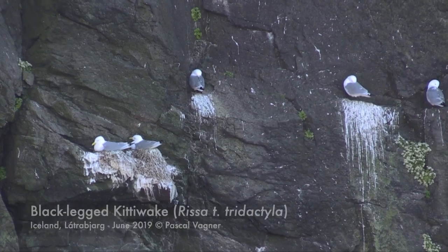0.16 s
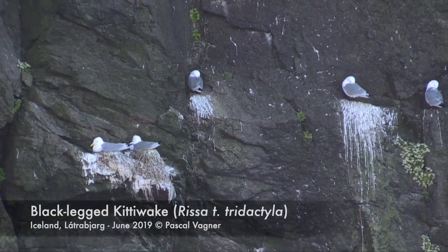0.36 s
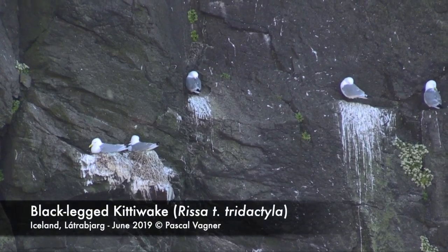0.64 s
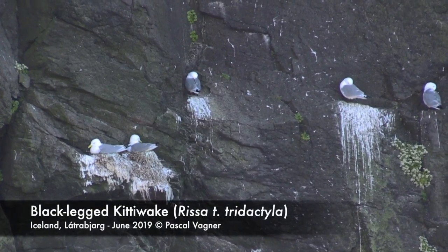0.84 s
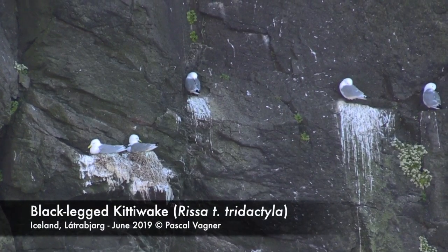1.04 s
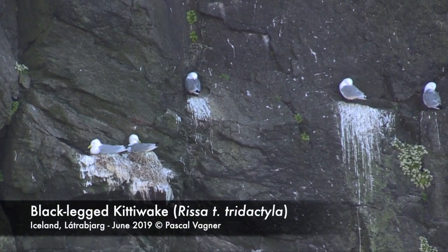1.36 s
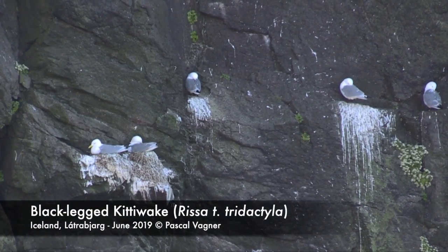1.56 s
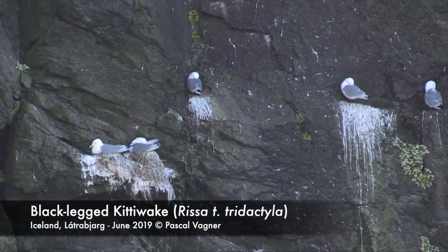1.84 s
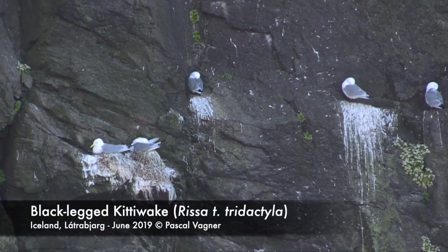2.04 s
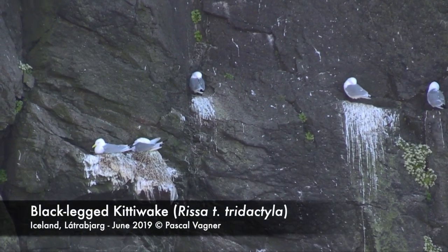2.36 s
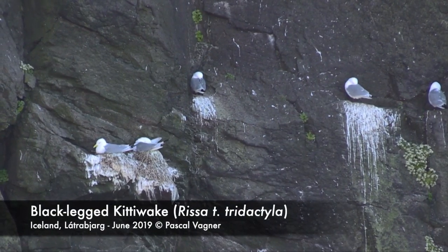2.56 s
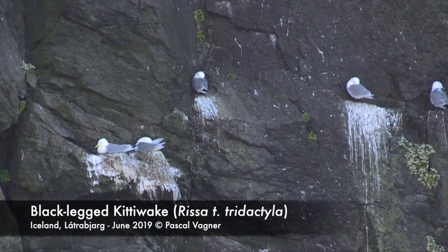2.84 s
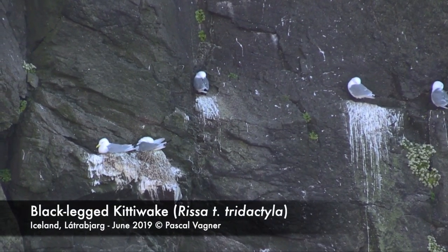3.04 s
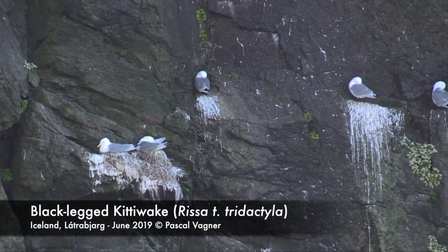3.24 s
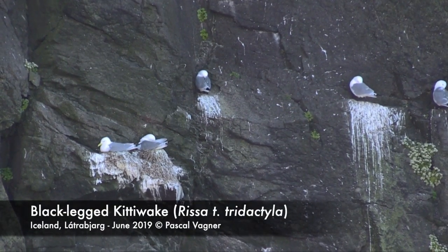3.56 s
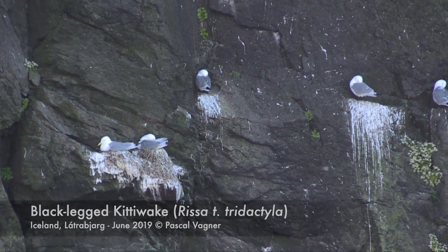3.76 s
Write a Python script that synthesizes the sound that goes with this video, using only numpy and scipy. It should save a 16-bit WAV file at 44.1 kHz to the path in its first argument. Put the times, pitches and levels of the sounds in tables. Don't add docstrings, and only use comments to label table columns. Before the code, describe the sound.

Gulls call on a sea cliff: hoarse cackling is densest from 0.1 to 1.1 seconds, with the loudest squeals near 0.4. A hard raspy break and falling squeal come at 1.2, then spaced cackles and clucks, with squeals around 2.1, 3.0 and 3.8. A far colony clamours continuously over faint surf, with short rock echoes. Soft wind puffs touch the microphone between 0.4 and 2.7.

```python
import sys
import numpy as np
from scipy import signal
from scipy.fft import rfft, irfft
from scipy.io import wavfile

SR = 44100
rng = np.random.default_rng(int(sys.argv[2]) if len(sys.argv) > 2 else 0)


def materialize(psi):
    bounded = np.clip(np.atleast_2d(psi).T, -1, 1)
    quanta = np.round(bounded * 32767).astype(np.int16)
    wavfile.write(sys.argv[1], SR, quanta)


def gain_from_db(level_db):
    decades = np.asarray(level_db, float) / 20
    return 10 ** decades


N = 172431

# time in seconds, level in dB.
CLAMOUR_LEVEL = [(.05, -35), (.5, -35.5), (.7, -37.5), (1.25, -35), (1.4, -38.5), (1.75, -39), (2.1, -38),
                 (2.45, -40), (2.78, -40), (3.05, -40), (3.25, -40), (3.55, -38.5), (3.9, -38)]
# frequency in Hz, density in dB per Hz.
CLAMOUR_COLOUR = [(300, -33), (450, -24), (700, -5.5), (1300, 3.5), (1900, -3), (4000, -12.5),
                  (10500, -37.5), (15000, -56)]
# frequency in Hz, density in dB per Hz.
SURF_COLOUR = [(15, -48), (25, -5), (97, -10), (128, -7.5), (243, -14.5), (600, -2), (780, -26),
               (1320, -120)]
# start in seconds, length in seconds, start pitch in Hz, end pitch in Hz,
# level in dB, beak resonance in Hz.
SQUEALS = [
    (0.03, 0.098, 962, 924, -43, 5240),
    (1.214, 0.11, 935, 892, -34.5, 5190),
    (2.102, 0.098, 930, 865, -36.5, 4240),
    (2.165, 0.059, 845, 840, -55, 2600),
    (3.008, 0.078, 900, 888, -42, 3580),
    (3.049, 0.057, 861, 856, -42.5, 3430),
    (3.11, 0.023, 857, 840, -40.5, 3350),
    (3.771, 0.048, 950, 947, -50.5, 3800),
    (3.854, 0.053, 946, 922, -45.5, 3780),
    (3.888, .04, 889, 904, -38, 2630),
]
# start in seconds, length in seconds, start pitch in Hz, end pitch in Hz,
# level in dB.
SCREAMS = [
    (.357, 0.069, 941.6, 918.6, -28),
    (.432, 0.0473, 921, 877, -34),
]
# start in seconds, length in seconds, start pitch in Hz, beak resonance in Hz,
# level in dB.
RISES = [(0.036, 0.22, 628.4, 2140, -45), (.045, .1, 718, 2870, -51), (.282, 0.075, 661, 4650, -41),
         (.335, 0.057, 686, 4870, -43), (0.712, 0.058, 598, 2900, -48.5), (0.756, 0.039, 698, 2150, -44.5),
         (0.766, .07, 620, 4800, -44), (0.842, 0.075, 636, 3200, -49.5), (0.898, 0.124, 648.4, 4760, -41),
         (1.032, 0.1, 604, 2400, -53.5), (1.116, 0.12, 655, 4600, -46), (1.584, 0.032, 648, 2740, -45),
         (1.621, 0.057, 698, 2630, -46.5), (1.824, .09, 703, 3270, -51.5), (1.93, 0.24, 616.5, 2540, -53.5),
         (2.053, 0.15, 660, 2250, -47.5), (2.474, 0.077, 599.5, 4850, -45.5), (2.808, 0.05, 650, 2620, -53),
         (2.935, 0.024, 602, 4150, -43), (2.962, 0.056, 624, 3140, -49.5), (3.361, 0.058, 619.5, 4400, -47),
         (3.74, 0.15, 634, 3200, -57), (3.852, 0.09, 631, 3160, -50)]
# multiple of the pitch, level in dB.
RISE_PARTIALS = [(1, -9.5), (2, -4), (3, -1.5), (5, -4), (7, -12.5), (11, -25.5)]
# multiple of the pitch, level in dB.
SQUEAL_PARTIALS = [(1, -27), (2, -1), (3, -8.5), (4, -10.5), (5, -11.5), (6, -14), (7, -20.5), (8, -26)]
# multiple of the pitch, level in dB.
SCREAM_PARTIALS = [(1, -42), (2, -0.5), (3, -20), (4, -7), (5, -22), (6, -18.5), (7, -37), (8, -19.5)]
# start in seconds, peak level in dB, length in seconds, throat resonance in Hz.
CACKLES = [(0.14, -28.5, 0.015, 1345), (0.401, -24, 0.024, 1313), (0.475, -24.5, 0.025, 1300),
           (0.539, -25.5, 0.034, 1340), (0.63, -24.5, 0.03, 1270), (.705, -23.5, .035, 1333),
           (0.801, -21.5, 0.024, 1287), (0.871, -23.5, 0.028, 1250), (0.901, -23, 0.024, 1250),
           (0.918, -31.5, 0.041, 1270), (0.984, -27, 0.045, 1246), (1.03, -30.5, 0.06, 1315),
           (1.119, -34, 0.016, 1260), (1.413, -27, 0.012, 1290), (1.6102, -23.5, .024, 1274),
           (1.781, -23, 0.033, 1250), (1.914, -22, 0.021, 1320), (2.031, -25, .025, 1330),
           (2.145, -27, 0.022, 1410), (2.2645, -27, 0.013, 1294), (2.385, -29.5, .03, 1300),
           (2.504, -25.5, 0.011, 1330), (2.6474, -27.5, 0.031, 1320), (2.8095, -23, 0.012, 1310),
           (2.923, -28, 0.022, 1240), (3.054, -28, .008, 1360), (3.159, -27, 0.014, 1330),
           (3.309, -29, 0.023, 1270)]
# multiple of the main one, width in Hz, level in dB.
THROAT = [(1, 120, 0), (1.45, 350, -9), (2.3, 700, -15), (3.3, 900, -18), (4.6, 1500, -22)]
# start in seconds, length in seconds, level in dB, centre frequency in Hz.
PUFFS = [(0.402, 0.066, -52, 260), (0.477, 0.014, -42, 248), (0.516, 0.068, -60.5, 247),
         (0.647, 0.15, -48.5, 298), (0.895, 0.073, -45, 390), (1.042, 0.036, -53.5, 330),
         (1.127, 0.023, -39, 523), (1.157, 0.061, -47, 367), (0.836, 0.026, -51, 378),
         (1.241, 0.041, -48, 418), (1.294, 0.054, -52.5, 427), (1.488, 0.039, -74, 460),
         (1.4, 0.19, -53.5, 467), (1.607, 0.11, -49.5, 470), (1.764, 0.18, -47, 500),
         (1.958, 0.012, -41, 505), (1.996, 0.065, -51.5, 476), (2.134, 0.051, -54.5, 403),
         (2.193, 0.037, -45, 454), (2.277, 0.061, -50, 452), (2.357, 0.037, -59, 456),
         (2.423, 0.0089, -57, 402), (2.458, 0.02, -58.5, 400), (2.496, 0.034, -55.5, 486),
         (2.547, 0.022, -47.5, 513), (2.619, 0.015, -59, 405), (2.67, 0.013, -51, 460)]
# start in seconds, peak level in dB.
RASPS = [
    (0.4794, -43),
    (0.547, -23),
    (0.633, -26.5),
    (1.2079, -14),
    (1.7818, -48),
    (2.653, -23),
    (2.81, -30.5),
]
# start in seconds, peak level in dB, throat resonance in Hz.
CLUCKS = [(1.1464, -46, 1070), (1.714, -28, 1030), (1.9923, -36, 1250), (2.2137, -21.5, 1460),
          (2.2214, -21, 1550), (2.3214, -23, 1500), (2.4273, -29, 1350), (2.5494, -24, 1260),
          (2.573, -25, 1420), (2.6264, -31, 1210), (3.559, -24.5, 1380), (3.7823, -24, 1260)]
# frequency in Hz, lead of the left port in radians.
PORT_PHASE = [(1, 0.23), (340, -1.2), (1290, -0.82), (2330, -1.19), (5340, -2.03), (15300, -0.92)]
# frequency in Hz, share of the sound common to both.
PORT_SHARE = [(60, 0.099), (250, 0.29), (430, 1), (750, 0.65), (1300, 0.25), (4000, 0.77), (12000, 0.045)]
# time in seconds, lead of the left port in radians.
PORT_TURN = [(0, 3.25), (.75, 2.84), (1.1, 2.79), (2.4, 1.3), (2.8, 0.27), (3.9, 0.14)]


def in_time(rows):
    s, value = np.transpose(rows)
    return np.interp(np.arange(N) / SR, s, value)


def at_hz(points, hz):
    f, value = np.transpose(points)
    return np.interp(np.log(hz + 1), np.log(f + 1), value)


def rms_one(x):
    return x / np.sqrt(np.mean(x ** 2) + 1e-20)


def drift(rate_hz):
    r = np.exp(-80 * np.pi * rate_hz / SR)
    slow = signal.lfilter([1], [1, -2 * r, r * r], rng.standard_normal(N // 40 + 2002))[2000:]
    return np.interp(np.arange(N) / 40, np.arange(len(slow)), rms_one(slow))


def band(x, low_hz, high_hz):
    return signal.sosfilt(signal.butter(2, [low_hz, high_hz], "band", fs=SR, output="sos"), x)


def resonance(x, hz, width_hz):
    r = np.exp(-np.pi * width_hz / SR)
    poles = [1, -2 * r * np.cos(2 * np.pi * hz / SR), r * r]
    return signal.lfilter([(1 - r * r) / 2, 0, (r * r - 1) / 2], poles, x)


def add(out, s, sound):
    i = int(s * SR)
    out[..., i:i + sound.shape[-1]] += sound[..., :out.shape[-1] - i]


def envelope(length_s, rise_s, fall_s):
    t = np.arange(int((length_s + 4 * fall_s) * SR)) / SR
    return t, np.minimum(t / rise_s, 1) * np.exp(-np.maximum(t - length_s, 0) / fall_s)


def cliff_echo(x):
    t60_s = 0.22
    t = np.arange(int(0.6 * SR)) / SR
    tail = band(rng.standard_normal((2, len(t))), 450, 4830) * gain_from_db(-60 * t / t60_s) * (t > 0.008)
    tail = tail / np.sqrt(np.sum(tail ** 2, 1, keepdims=True))
    return signal.fftconvolve(x, tail, axes=1)[:, :N]


def bed(colour, patchy_db):
    together, edges_hz = drift(3.3), 22 * 2 ** np.arange(0, 9.6, 0.5)
    white = rng.standard_normal((2, 2, N))
    spec, f = rfft(white), np.fft.rfftfreq(N, 1 / SR)
    share = np.clip(at_hz(PORT_SHARE, f), 0, 1)
    common = share * spec[:, 0] * np.exp(-1j * at_hz(PORT_PHASE, f))
    spec[:, 1] = common + np.sqrt(1 - share ** 2) * spec[:, 1]
    white = irfft(spec, N)
    out = 0
    for k, (low, high) in enumerate(zip(edges_hz, edges_hz[1:])):
        flicker = 0.3 * together + drift(13.3)
        depth_db = patchy_db * min(1, 3500 / high) ** 2
        level_db = at_hz(colour, np.sqrt(low * high)) + depth_db * flicker
        out = out + gain_from_db(level_db) * band(white[k % 2], low, high)
    return rms_one(out)


def gliding_notes(rows, partials, hoarse=1.0, beaks=None):
    attack_s, half_release_s, wobble_depth, flutter_db = 0.012, 0.008, 0.005, 7.0
    beak_db, beak_width_hz = 9, 500
    fade_db = 5
    out = np.zeros((2, N))
    wobble = hoarse * (drift(30.3) + drift(117))
    flutter = np.array([drift(18) + 0.6 * drift(90) for _ in range(6)]) - 1
    multiple, partial_db = np.transpose(partials)
    orders = np.arange(1, int(round(multiple[-1])) + 1)
    for j, (s, length, hz0, hz1, level_db) in enumerate(rows):
        t, env = envelope(length - half_release_s, attack_s, half_release_s)
        at = np.minimum(int(s * SR) + np.arange(len(t)), N - 1)
        pitch = (hz0 + (hz1 - hz0) * t / length) * (1 + wobble_depth * wobble[at])
        phase = 2 * np.pi * np.cumsum(pitch) / SR
        draw = rng.random((4, 16))
        for n in orders:
            lead = at_hz(PORT_PHASE, n * hz0) + draw[1, n] - 0.5
            own = flutter[[n % 6, (n + 3) % 6]][:, at]
            own = own - own.mean(1, keepdims=True)
            lift_db = beak_db * np.exp(-((n * hz0 - beaks[j]) / beak_width_hz) ** 2) if beaks else 0
            db = level_db + 6.5 + np.interp(n, multiple, partial_db) + lift_db
            gain = gain_from_db(db + flutter_db * 0.5 * own - fade_db * t / length)
            start = 2 * np.pi * draw[0, n] + np.array([[lead], [0]])
            add(out, s, env * gain * np.sin(n * phase + start))
    return out


def far_birds():
    rows = []
    for when, length, pitch, fall, level in rng.random((100, 5)):
        hz = 580 + 400 * pitch
        rows.append((3.85 * when, 0.0395 + 0.0966 * length, hz, hz * (0.95 + 0.099 * fall), -7 * level))
    return rms_one(gliding_notes(rows, RISE_PARTIALS, hoarse=2.56))


def far_clamour():
    calls_db, wash_db = -10.5, -1
    far = far_birds()
    calls = 0.6 * far + 0.8 * cliff_echo(far)
    wash = bed([(150, -46)] + CLAMOUR_COLOUR, patchy_db=1.0)
    return gain_from_db(in_time(CLAMOUR_LEVEL)) * (gain_from_db(calls_db) * calls + gain_from_db(wash_db) * wash)


def surf():
    surf_db, spray_db = -57.5, -57.5
    rumble = bed(SURF_COLOUR + [(1500, -15.5)], patchy_db=1.5)
    spray = rms_one(band(rng.standard_normal((2, N)), 4450, 9200))
    return gain_from_db(surf_db) * rumble + gain_from_db(spray_db + np.array([[2.5], [-2.5]])) * spray


def near_birds():
    rise_hz_per_s = 130
    glides = [(s, length, hz, hz + rise_hz_per_s * length, db) for s, length, hz, _, db in RISES]
    rises = gliding_notes(glides, RISE_PARTIALS, hoarse=1.61, beaks=[row[3] for row in RISES])
    falls = [row[:5] for row in SQUEALS]
    squeals = gliding_notes(falls, SQUEAL_PARTIALS, beaks=[row[5] for row in SQUEALS])
    return rises + squeals + gliding_notes(SCREAMS, SCREAM_PARTIALS)


def cackles():
    rise_s, fall_s = 0.002, 0.008
    pulse_hz, pulse_jitter, breathy = 330, 0.3, 0.45
    swing_db = 4.5
    out = np.zeros((2, N))
    cycle = np.cumsum(pulse_hz * (1 + pulse_jitter * np.tanh(drift(60)))) / SR
    pulses = (np.diff(np.floor(cycle), prepend=0) > 0) * gain_from_db(3.0 * np.tanh(drift(120))) * 11
    source = pulses + breathy * rng.standard_normal((2, N)) * (1.3 - cycle % 1)
    for s, db, length, throat_hz in CACKLES:
        pan_db = swing_db * np.exp(-((s - 2.1) / 0.3) ** 2)
        t, env = envelope(length, rise_s, fall_s)
        part = source[:, int(s * SR):int(s * SR) + len(t)]
        voice = 0
        for j, (multiple, width_hz, gain_db) in enumerate(THROAT):
            voice = voice + (-1) ** j * gain_from_db(gain_db) * resonance(part, throat_hz * multiple, width_hz)
        voice = rms_one(resonance(voice, throat_hz, 1700)) * env[:part.shape[1]]
        add(out, s - 0.003, voice * gain_from_db(db - 8.5 + pan_db * np.array([[0.5], [-0.5]])))
    return out


def wind():
    lump_db, port_cut_hz, thump_db, veer_db_per_s = 5, 183, -10.5, 14.5
    out = np.zeros((2, N))
    noise = rng.standard_normal(N) * gain_from_db(lump_db * np.tanh(drift(93)))
    high_pass = signal.butter(4, port_cut_hz, "high", fs=SR, output="sos")
    for s, length, db, hz in PUFFS:
        left_db = min(veer_db_per_s * max(s - 0.7, 0), 4.5)
        t, env = envelope(length, 0.0044, 0.018)
        part = noise[int(s * SR):int(s * SR) + len(t)]
        gust = gain_from_db(db) * env * rms_one(band(part, hz * 0.75, hz * 2.58))
        gust = gain_from_db(5.5) * signal.sosfilt(high_pass, gust)
        low = rms_one(band(band(part, 103, 240), 103, 240))
        thump = gain_from_db(thump_db + db) * env * low * (300 / hz) ** 2
        add(out, s, gust * [[gain_from_db(left_db / 2)], [gain_from_db(-left_db / 2)]] + thump)
    return out


def rasps():
    out = np.zeros((2, N))
    for s, db in RASPS:
        t, env = envelope(0.01, 0.0012, 0.007)
        breath = band(rng.standard_normal((2, len(t))), 3250, 9900)
        add(out, s - 0.003, gain_from_db(db - 19.0) * env * rms_one(resonance(breath, 4800, 1850)))
    return out


def clucks():
    width_hz, cluck_db = 190, -3
    out, t = np.zeros((2, N)), np.arange(int(0.02 * SR)) / SR
    env = (1 - np.exp(-t / 0.0012)) * np.exp(-np.pi * width_hz * t)
    for s, db, hz in CLUCKS:
        ring = env * (np.sin(2 * np.pi * hz * t) + 0.59 * np.sin(2.9 * np.pi * hz * t))
        add(out, s - 0.002, gain_from_db(db + cluck_db) * ring / np.abs(ring).max() * gain_from_db([[1.5], [-1.5]]))
    return out


def turn_ports(x):
    f, spec, right = np.fft.rfftfreq(N, 1 / SR), rfft(x[1]), x[1]
    for low_hz, high_hz, share in [(85, 200, 0.6), (200, 303.6, 0.72), (303.6, 825, 1)]:
        low = signal.hilbert(irfft(spec * ((f > low_hz) & (f <= high_hz)), N))
        right = right + np.real(low * (np.exp(-1j * share * in_time(PORT_TURN)) - 1))
    return np.array([x[0], right])


def scene():
    near_echo_db, hoarse_echo_db, left_db = -11.5, -11.5, 0.4
    air = far_clamour() + surf()
    near = near_birds()
    air = air + near + gain_from_db(near_echo_db) * cliff_echo(near)
    hoarse = cackles() + rasps() + clucks()
    air = air + hoarse + gain_from_db(hoarse_echo_db) * cliff_echo(hoarse)
    return turn_ports(air * gain_from_db([[left_db], [-left_db]]) + wind())


def band_limit(x):
    return signal.sosfilt(signal.butter(12, 15700, fs=SR, output="sos"), x)


def record(dry):
    start_s = 0.0365
    opened = dry * (np.arange(N) > start_s * SR)
    low_pass = signal.cheby2(10, 50, 15900, fs=SR, output="sos")
    return band_limit(signal.sosfilt(low_pass, opened))


dry = scene()
out = record(dry)
materialize(out)
```